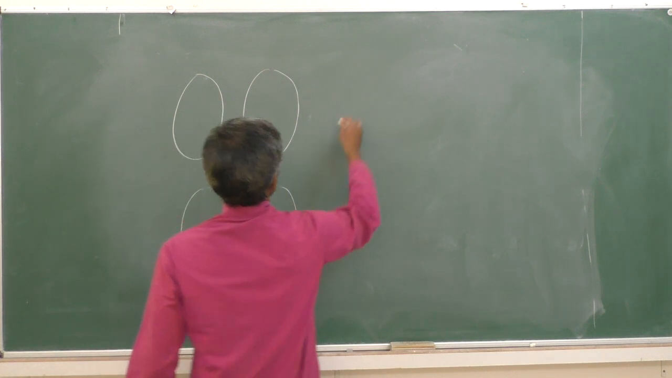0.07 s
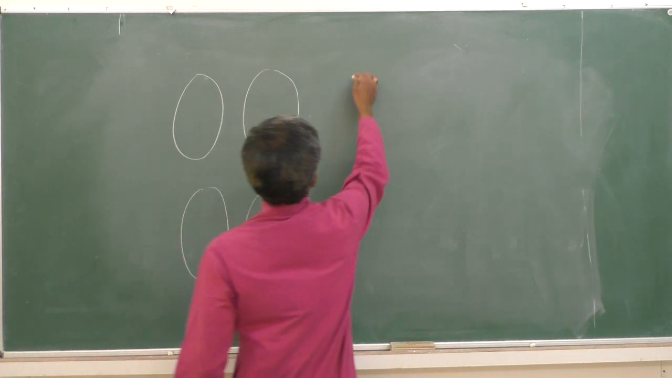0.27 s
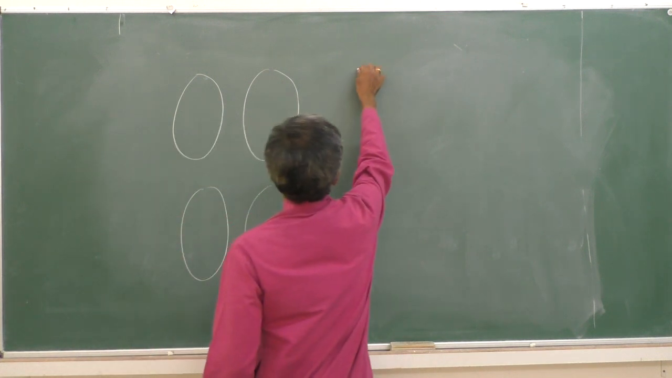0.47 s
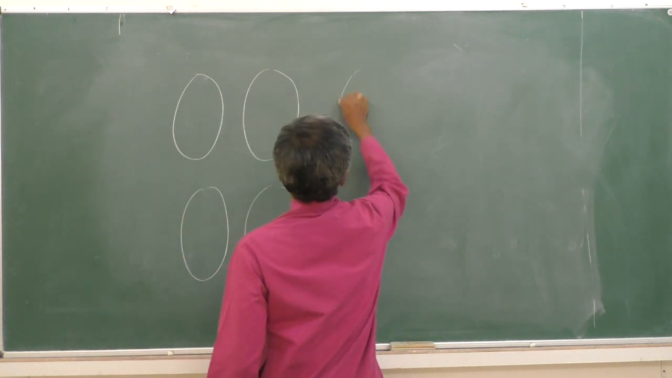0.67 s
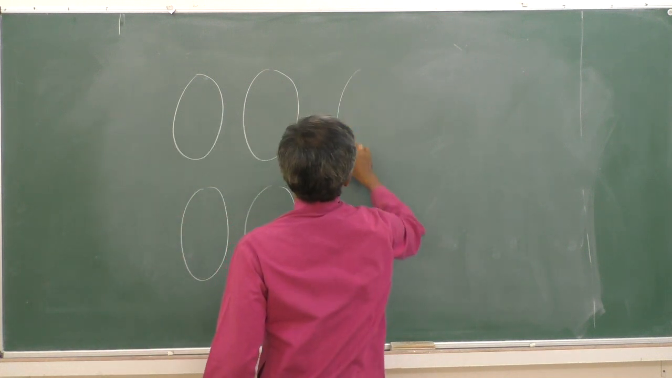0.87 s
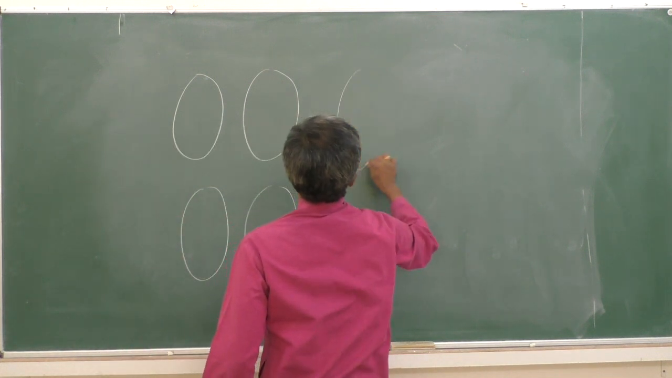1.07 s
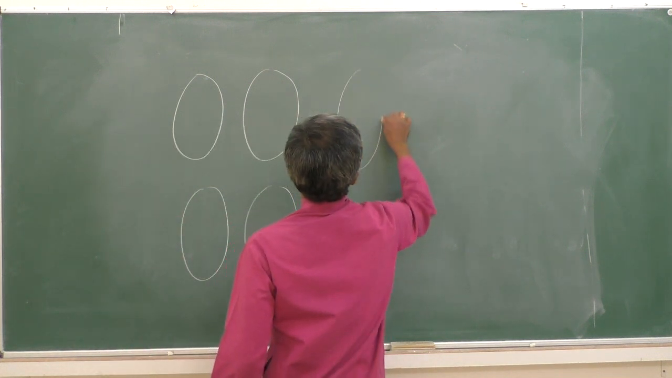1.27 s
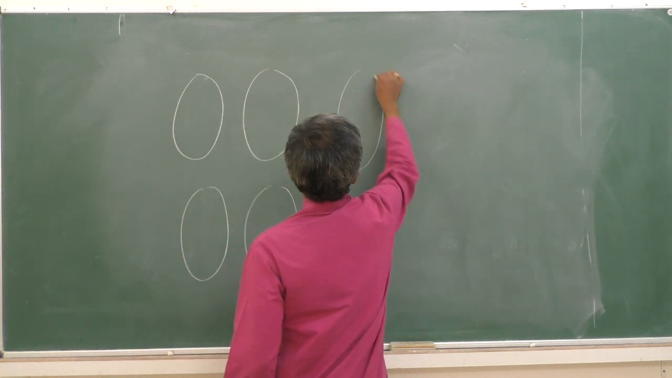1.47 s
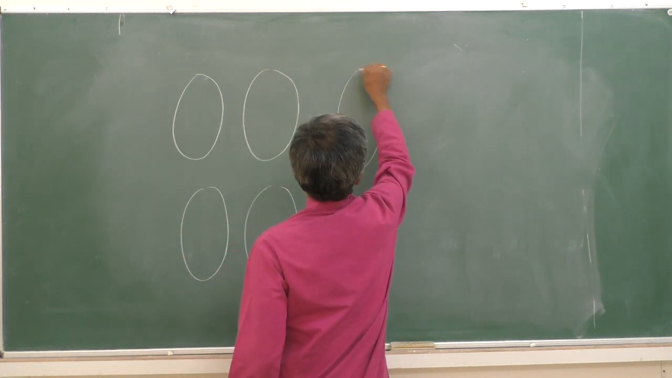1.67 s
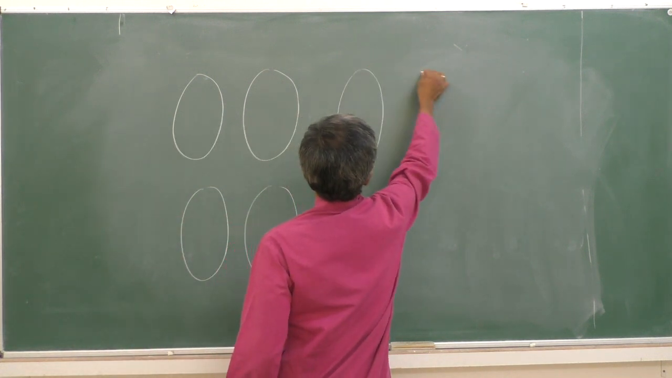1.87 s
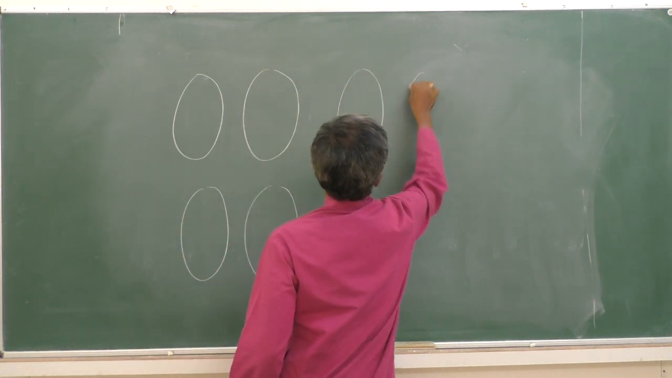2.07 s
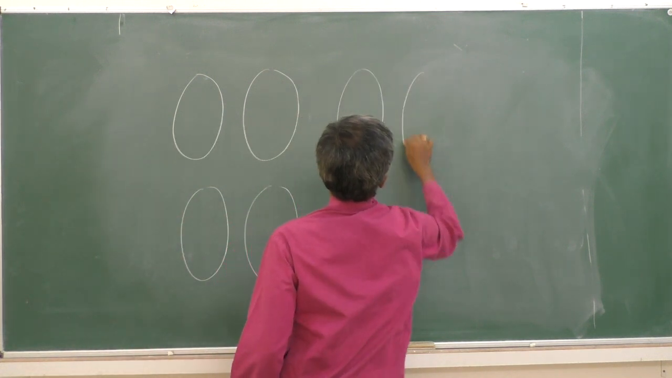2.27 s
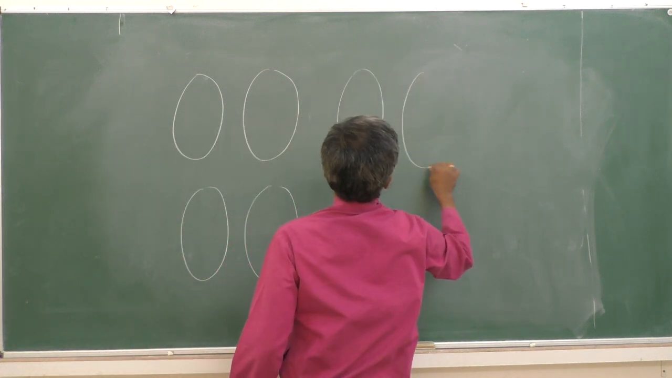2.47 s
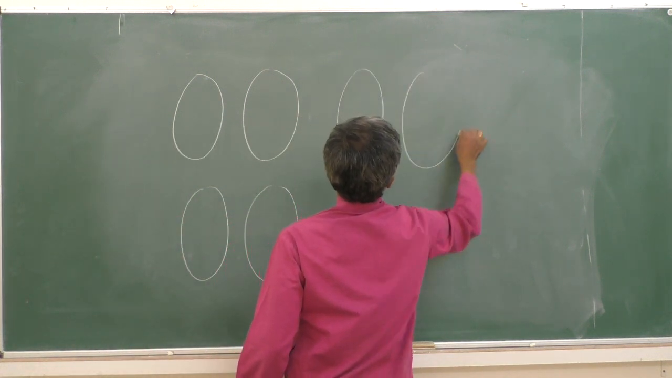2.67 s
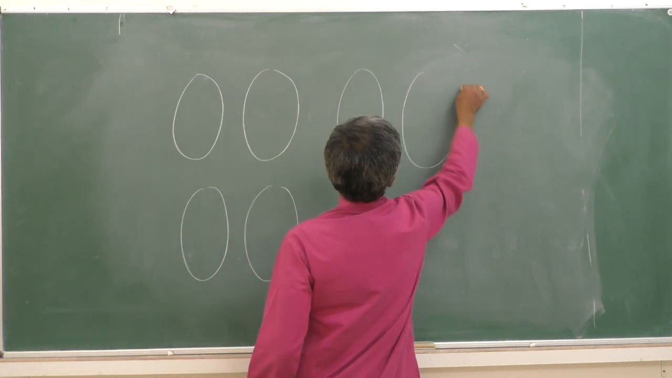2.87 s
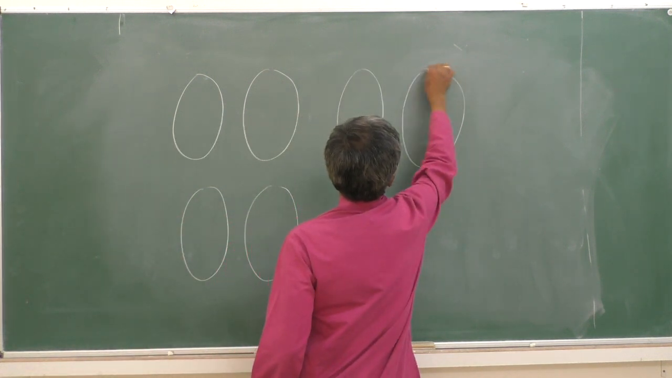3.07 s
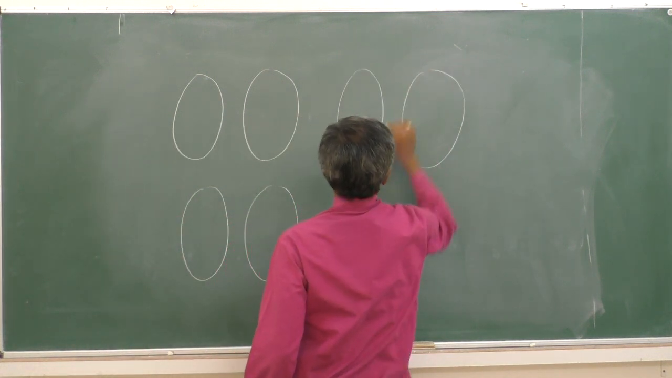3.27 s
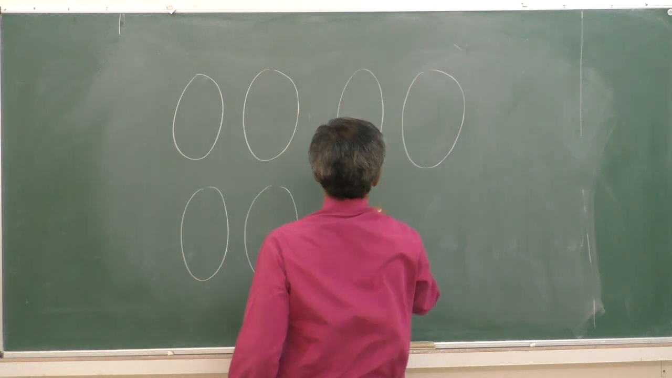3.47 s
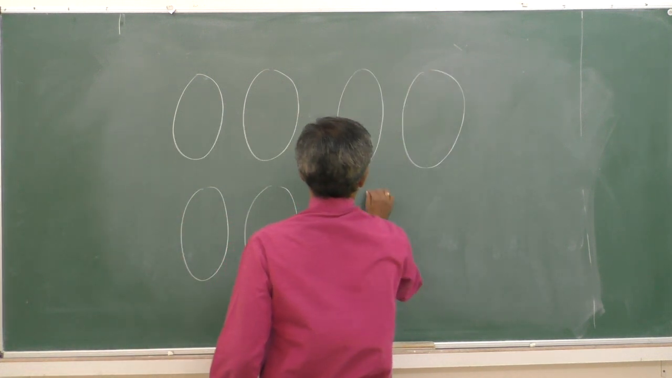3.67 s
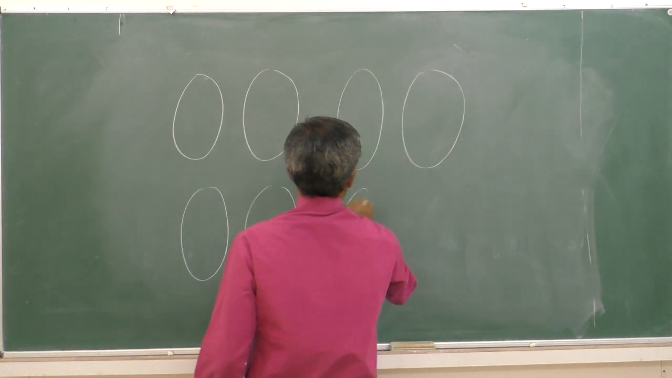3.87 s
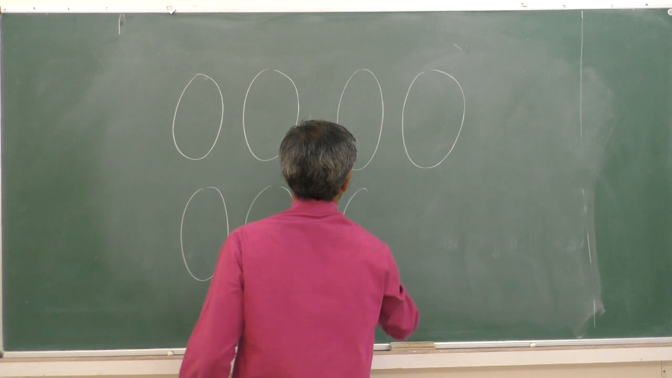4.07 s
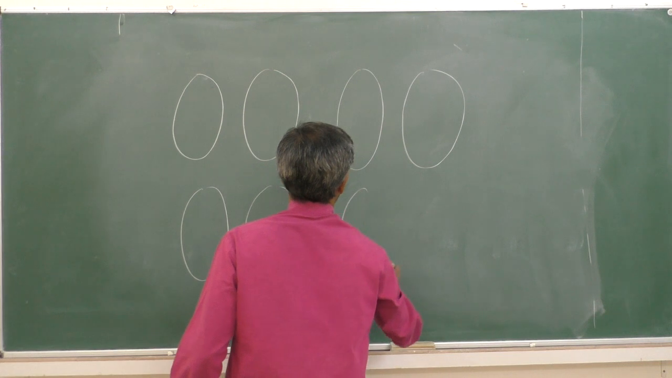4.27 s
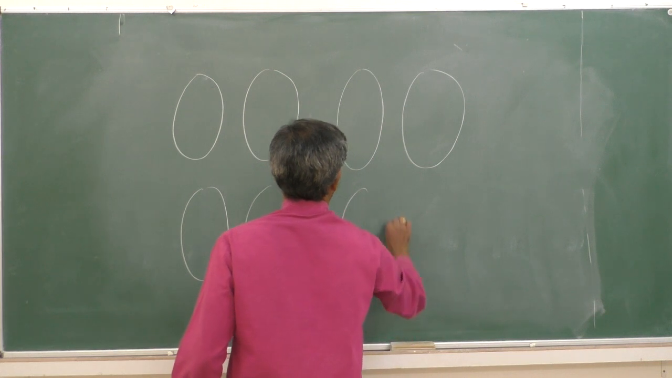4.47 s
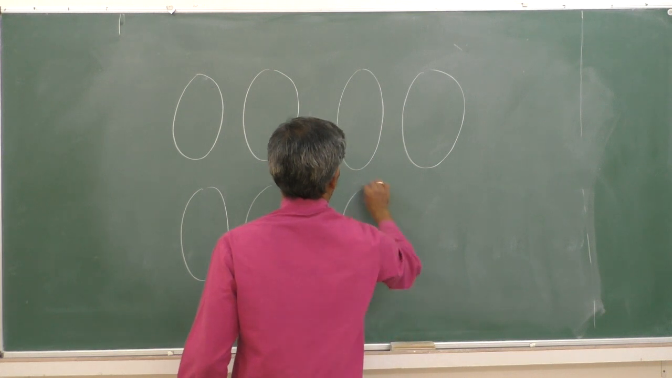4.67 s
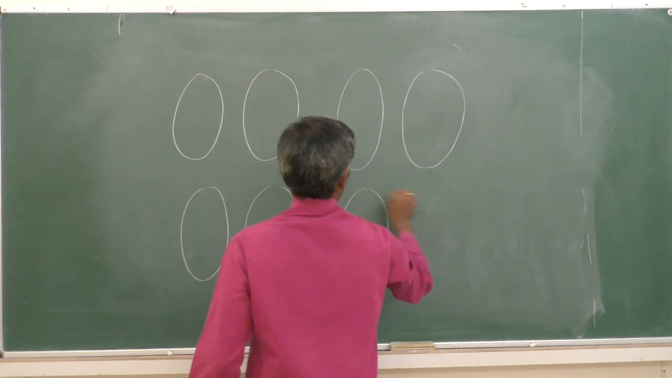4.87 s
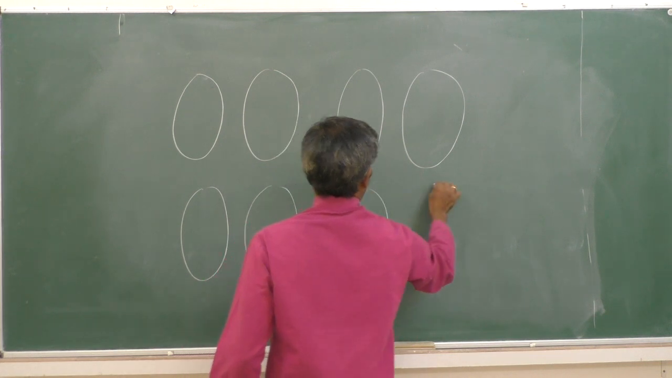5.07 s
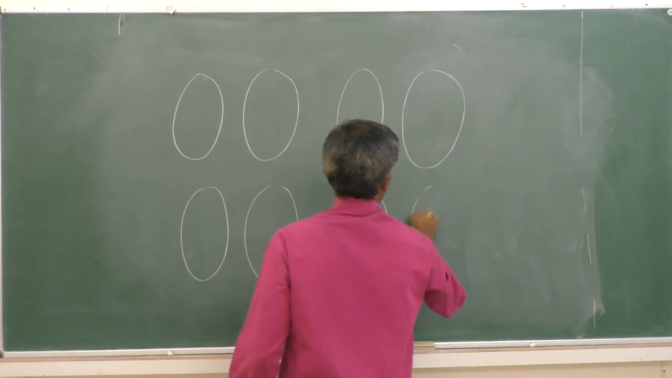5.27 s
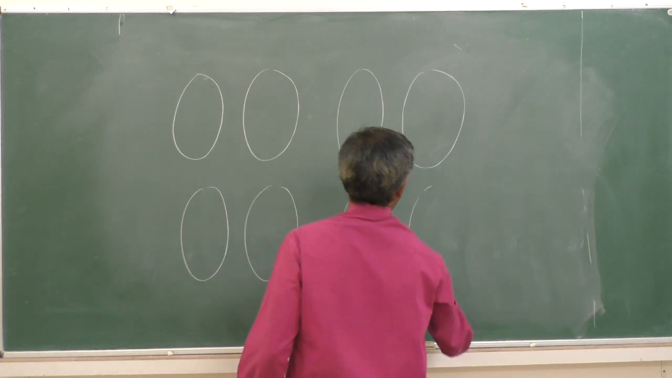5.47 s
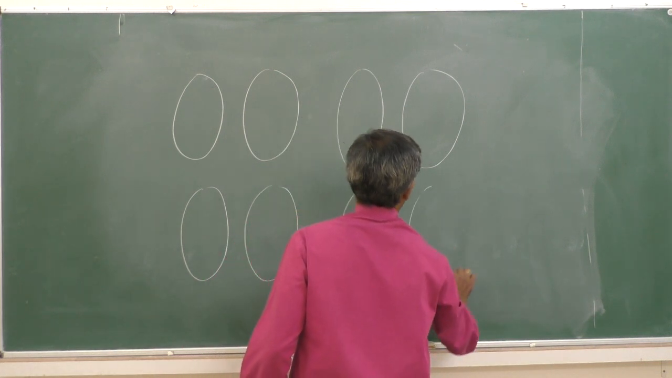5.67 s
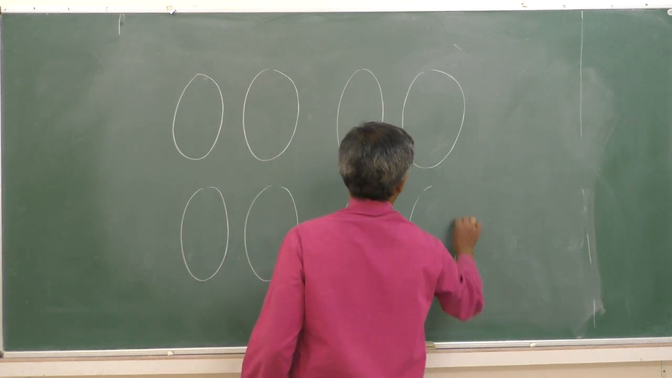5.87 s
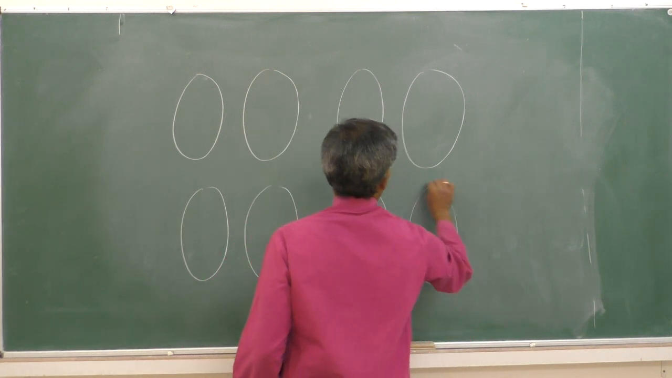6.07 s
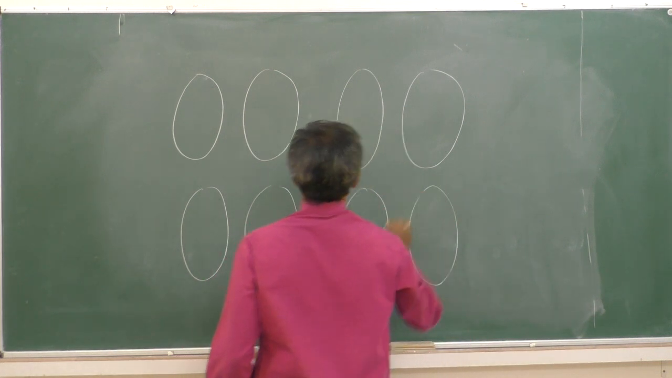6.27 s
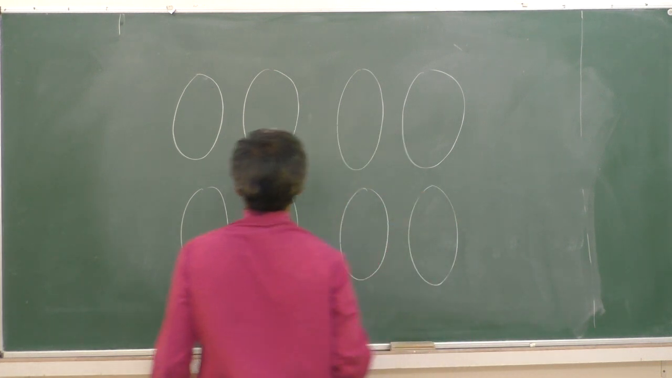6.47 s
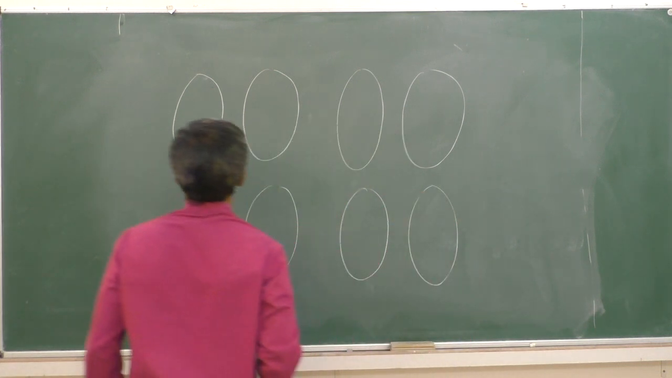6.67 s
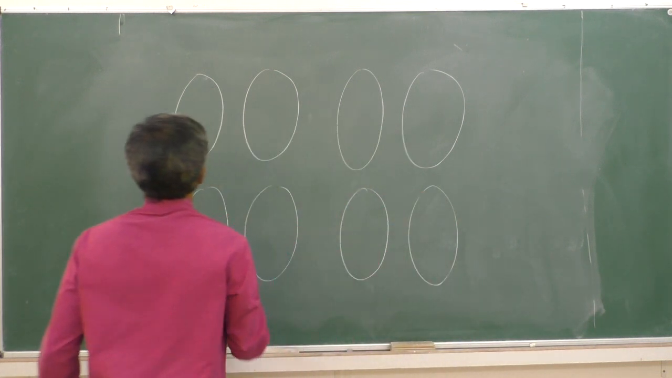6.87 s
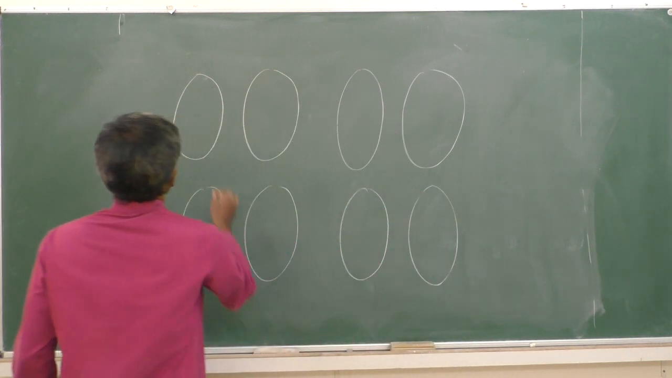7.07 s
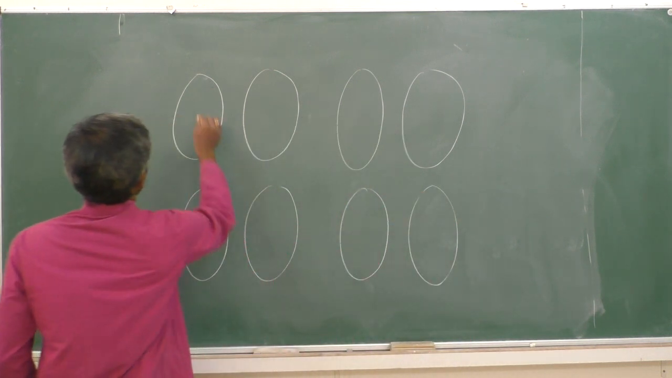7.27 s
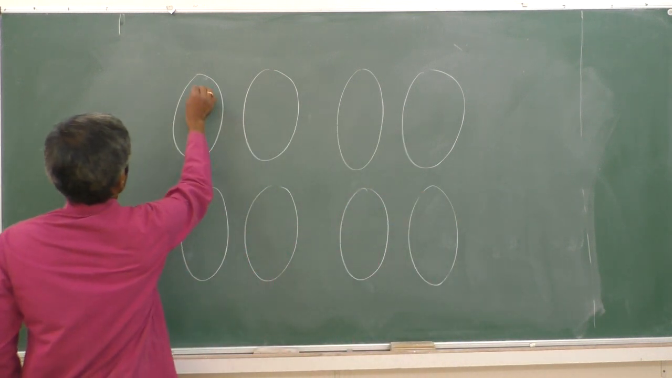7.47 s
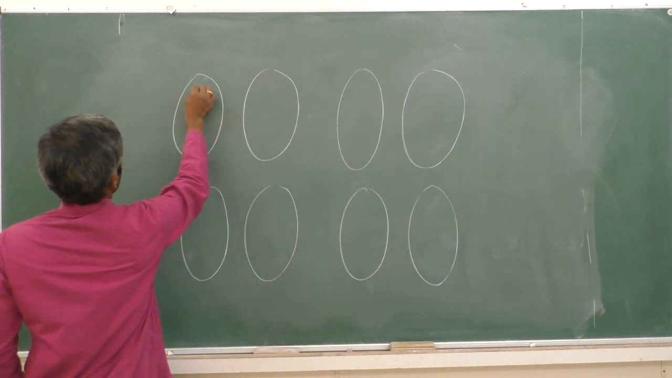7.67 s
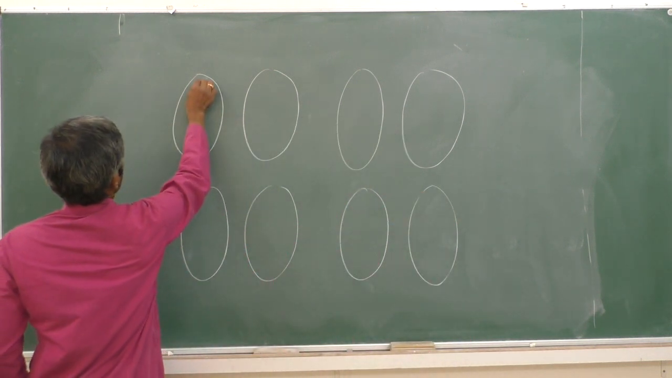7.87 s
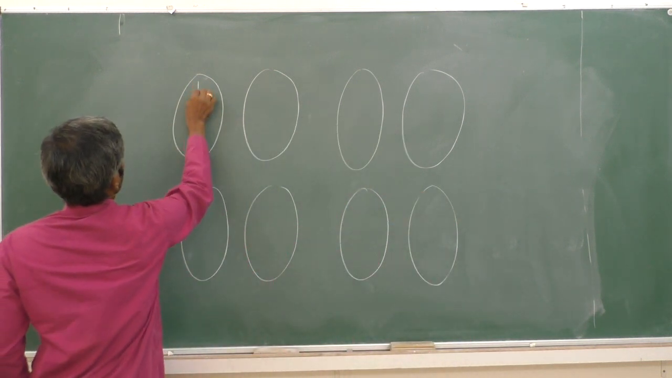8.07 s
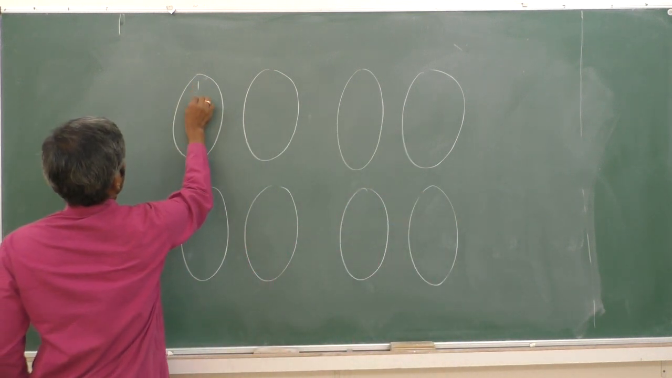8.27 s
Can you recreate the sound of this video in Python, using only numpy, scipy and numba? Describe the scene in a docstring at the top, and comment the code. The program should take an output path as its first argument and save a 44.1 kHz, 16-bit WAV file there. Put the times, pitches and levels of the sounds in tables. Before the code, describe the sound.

Four scratchy chalk ovals, each begun with a hard tap, then a pause and two small taps, in a humming, echoing classroom.

```python
"""Chalk ovals on a blackboard

Four ovals are drawn with chalk, then a character is begun, in a classroom with mains hum and soft air noise.
Taps (noise cracks, knocks, ringing modes) precede each stroke; two more fall in oval three and after the hook.
Random slips drive three moving resonances: board rasp near the oval tops, scrape and dust hiss on fast flanks.
Short echoes sweep with hand height. Filtered noise makes faint cloth rustle, soft bumps and a low rumble.
"""
import sys
import numpy as np
from scipy import signal
from scipy.fft import rfft, irfft
from scipy.io import wavfile
from scipy.ndimage import uniform_filter1d
from numba import njit

SR = 44100
rng = np.random.default_rng(int(sys.argv[2]) if len(sys.argv) > 2 else 0)


def generate_wav(sig):
    """Save sig (samples, or channels by samples) to the path in sys.argv[1] as 16-bit PCM at SR."""
    pcm = np.round(np.clip(np.atleast_2d(sig).T, -1, 1) * 32767).astype(np.int16)
    wavfile.write(sys.argv[1], SR, pcm)


N = 367353
TIME = np.arange(N) / SR


def undb(db):
    """Decibels to gain."""
    return 10 ** (np.asarray(db) / 20)


def unit(x):
    """Scale to rms 1."""
    return x / np.sqrt(np.mean(x ** 2))


def add(out, start_s, x):
    """Mix x into out from start_s on."""
    i = int(start_s * SR)
    out[i:i + len(x)] += x[:len(out) - i]


def colour(x, points, size=4096):
    """Causal minimum-phase filter through (hz, db) points, by folding the cepstrum."""
    hz, db = np.transpose(points)
    log_hz = np.log(np.maximum(np.fft.rfftfreq(size, 1 / SR), 1))
    cepstrum = irfft(np.log(undb(np.interp(log_hz, np.log(hz), db))))
    cepstrum[1:size // 2] *= 2
    cepstrum[size // 2 + 1:] = 0
    impulse = irfft(np.exp(rfft(cepstrum)))
    return signal.oaconvolve(x, impulse)[:len(x)]


def passband(x, hz, kind, order=2):
    """Butterworth filter."""
    return signal.sosfilt(signal.butter(order, hz, kind, fs=SR, output="sos"), x)


def burst(envelope, band_hz):
    """Band of noise under an envelope; its energy is set by the envelope alone."""
    x = passband(rng.standard_normal(len(envelope)) * envelope, band_hz, "band")
    return x * np.linalg.norm(envelope) / np.linalg.norm(x)


def walk(rate_hz):
    """Smooth random wander with spread near 1."""
    k = int(SR / rate_hz)
    steps = np.repeat(rng.standard_normal(N // k + 1), k)
    return unit(uniform_filter1d(steps, k)[:N])


def crumble(per_s, spread_db):
    """Tiny slips at random moments; sizes are Gaussian, times a random gain of up to 4 spread_db."""
    slips = rng.random(N) < per_s / SR
    grain_db = spread_db * np.minimum(rng.exponential(size=N), 4)
    return unit(slips * rng.standard_normal(N) * undb(grain_db))


@njit
def resonance(x, hz, width_hz):
    """State-variable band-pass with a moving centre."""
    y, b, l = np.empty(len(x)), 0., 0.
    for i in range(len(x)):
        g, k = np.tan(np.pi * hz[i] / SR), width_hz / hz[i]
        v = (b + g * (x[i] - l)) / (1 + g * (g + k))
        b, l, y[i] = 2 * v - b, l + 2 * g * v, k * v
    return y


def classroom(x, t60_s=1.35, wet_db=-2.5, dull_hz=3600, gap_s=0.0057, size=66150):
    """Diffuse tail from bare walls, weak in the treble; each call draws its own reflections."""
    t = np.arange(size) / SR
    tail = rng.standard_normal(size) * np.exp(-np.log(1000) * t / t60_s) * (t > gap_s)
    # wet_db is the tail energy before the low-pass
    tail = passband(tail / np.linalg.norm(tail), dull_hz, "low")
    return x + undb(wet_db) * signal.oaconvolve(x, tail)[:len(x)]


# mains harmonics: (multiple, rms_db)
HARMONICS = [(1, -47), (2, -89.5), (3, -61.5), (4, -91.5), (5, -74.5), (7, -87.5), (9, -86), (13, -89),
             (15, -91)]
# room rush spectrum: (pitch_hz, relative_db)
AIR_COLOUR = [(20, 4), (60, 10.5), (100, 7), (200, 2.5), (400, -3), (700, -0.5), (1150, 2), (2000, 1),
              (3000, -3), (4500, -9), (7000, -17.5), (10000, -22), (12800, -25.5), (15000, -52)]
MAINS_HZ = 50
AIR_DB = -73  # rms within 900-4000 Hz


def background():
    """Steady mains hum, mostly odd harmonics, over the soft rush of the room."""
    hum = np.zeros(N)
    for multiple, rms_db in HARMONICS:
        hum += undb(rms_db) * np.sqrt(2) * np.cos(2 * np.pi * multiple * MAINS_HZ * TIME)
    air = colour(rng.standard_normal(N), AIR_COLOUR)
    air = air / np.std(passband(air, [900, 4000], "band"))
    return hum + air * undb(AIR_DB)


# knocks at the microphone: (start_s, level_db, low_edge_hz, high_edge_hz, decay_s)
MIC_BUMPS = [(0.16, -60, 15, 60, 0.062), (1.36, -68, 20, 90, .03), (2.334, -57.5, 15, 171, .018),
             (2.775, -57, 27, 280, 0.017), (3.383, -44.5, 15, 42, 0.037), (3.384, -54, 133, 370, 0.0056),
             (3.4094, -52, 190, 950, 0.0039), (7.082, -60, 30, 170, 0.019)]


def bumps(size=32768):
    """Dull knocks right at the microphone: decaying noise bands, without room tail."""
    out, t = np.zeros(N), np.arange(size) / SR
    for start_s, level_db, low_hz, high_hz, decay_s in MIC_BUMPS:
        add(out, start_s, undb(level_db) * burst(np.exp(-t / decay_s), [low_hz, high_hz]))
    return out


# chalk meets board: (start_s, low_knock_hz, low_knock_db, high_knock_hz, high_knock_db, crack_db)
CHALK_TAPS = [(0.467, 1360, -50.5, 2530, -55.5, -54), (1.929, 1320, -53.5, 2150, -60, -42),
              (3.7439, 1350, -46.5, 2590, -46.5, -50), (4.051, 1650, -53, 2060, -66, -53),
              (5.1564, 1130, -47, 2170, -45.5, -46.5), (7.944, 1190, -55, 1870, -56, -56.5),
              (8.262, 1450, -53.5, 2200, -60, -55)]
# ringing of the panel, detuned per tap: (nominal_hz, relative_db, t60_s)
PANEL_MODES = [(810, 1.5, 0.076), (1130, -19, 0.048), (1260, -26, 0.03), (1590, -24, .05),
               (1416, 13, 0.071), (1790, -4, 0.046), (2180, -8, 0.036), (2440, -26, 0.045),
               (2518, 12, 0.041), (2740, -9, 0.033), (2900, 2, .04), (3380, -6, 0.026)]
# crack spectrum: (pitch_hz, relative_db)
TIP_CRACK_COLOUR = [(300, -10), (650, -8.5), (2000, -5.5), (3800, 4.5), (4700, 3), (6000, 0.5), (7000, -11),
                    (9300, -17.5), (10500, -17), (14000, -39)]


def taps(ring_db=-22, swell_s=0.003, crack_s=0.0014, spread=1.27, panel_hz=4000, size=44100):
    """The tip cracks at once; slower bending waves cross the panel as a knock and leave its modes ringing."""
    out, t = np.zeros(N), np.arange(size) / SR
    swell = t / swell_s * np.exp(1 - t / swell_s)
    band = np.array([1 / spread, spread])
    for start_s, low_hz, low_db, high_hz, high_db, crack_db in CHALK_TAPS:
        crack = unit(colour(rng.standard_normal(size), TIP_CRACK_COLOUR)) * np.exp(-t / crack_s)
        low_knock = undb(low_db) * burst(swell, low_hz * band)
        high_knock = undb(high_db) * burst(swell, high_hz * band)
        knock = passband(low_knock + high_knock, panel_hz, "low", order=4)
        ring = np.zeros(size)
        for nominal_hz, mode_db, t60_s in PANEL_MODES:
            # each spot on the board detunes the modes a little
            mode_hz = nominal_hz * (1 + 0.036 * rng.standard_normal())
            wave = np.sin(2 * np.pi * mode_hz * t) * rng.choice([-1, 1])
            ring += undb(mode_db - 60 * t / t60_s) * wave
        tap = undb(crack_db) * crack + knock + undb(low_db + ring_db) * ring
        add(out, start_s, classroom(tap))
    return out


def loop(times_s, lift_speed):
    """Motion of one stroke: progress (0 start, 1 turn, 2 end), hand speed (0-1), depth below the top (0-1)."""
    progress = np.interp(TIME, times_s, np.arange(len(times_s)) / 2)
    speed = np.abs(np.sin(np.pi * progress))
    # the chalk leaves the board while it is still moving
    speed = speed + lift_speed * (1 - speed) * (progress > 3 / 2)
    depth = np.sin(np.interp(TIME, times_s[::2], [0, np.pi / 2, np.pi])) ** 2
    return progress, speed, depth


# one looping stroke a row, four ovals and a small hook; levels before the trims in drawing():
# ((start_s, fastest_down_s, turn_s, fastest_up_s, end_s),
#  (scrape_down_db, scrape_up_db, bend_vs_fast_db, stick_ring_hz), lift_off_speed (0-1),
#  (dust_vs_scrape_db, dust_rise_scale_hz), (rasp_start_db, rasp_turn_db, rasp_end_db),
#  (rasp_start_hz, rasp_end_hz))
CHALK_STROKES = [((0.5, 0.76, 1.118, 1.35, 1.63), (-65.5, -67.5, -8, 4040), 0.17, (-5.5, 3100),
                 (-66, -73, -71), (1500, 1930)), ((1.97, 2.26, 2.58, 2.7, 3.11), (-65, -72, -6.5, 4300),
                 0.097, (-4, 2100), (-69.5, -79, -66.5), (1660, 1700)), ((3.78, 4.03, 4.35, 4.58, 4.725),
                 (-70.5, -75.5, -4, 4198), 0.1, (-5, 100), (-63.5, -77.5, -67), (1420, 1500)),
                 ((5.19, 5.43, 5.698, 5.9, 6.125), (-73, -75.5, -2, 3950), 0.63, (-2.9, 1000),
                 (-62, -74, -62.5), (1250, 850)), ((7.99, 8.02, 8.045, 8.065, 8.085), (-74, -74, -2, 4400),
                 0.72, (1, 1200), (-86, -82.5, -78), (1470, 1470))]
TURN_RASP_HZ, STICK_HZ, DUST_HZ = 1960, 4330, 8370  # rasp at the turn; stick off the board; base of the hiss
RASP_FALL_POWER, RASP_RETURN_POWER = 1.5, 1  # above 1, rasp stays strong until near the bottom
BITE_S, BITE_SCRAPE_DB, BITE_RASP_DB = 0.18, -5.5, -4  # the chalk takes a moment to bite
DUST_SWING = 1.11  # dB of hiss per dB of scrape sink
DUST_BUILD_S, FRESH_DUST_DB = 0.33, -3  # dust gathers under the tip
BEND_RISE_HZ = 300  # the stick rings higher when it moves slowly


def hand(fade_s=0.012):
    """Gains and centres (Hz) of rasp, scrape and hiss, and hand height (-1 to 1), from the stroke motion."""
    gains, height = np.zeros((3, N)), np.zeros(N)
    centres_hz = np.outer([TURN_RASP_HZ, STICK_HZ, DUST_HZ], np.ones(N))
    for times_s, scrape, lift_speed, dust, rasp_levels_db, rasp_ends_hz in CHALK_STROKES:
        down_db, up_db, bend_db, ring_hz = scrape
        dust_db, rise_hz = dust
        start_db, turn_db, end_db = rasp_levels_db
        start_hz, end_hz = rasp_ends_hz
        # fades lie just outside the stroke
        contact = np.clip(np.minimum(TIME - times_s[0], times_s[-1] - TIME) / fade_s + 1, 0, 1)
        on = contact > 0
        progress, speed, depth = (v[on] for v in loop(times_s, lift_speed))
        age_s = TIME[on] - times_s[0]
        loose = np.clip(1 - age_s / BITE_S, 0, 1)
        fresh = np.clip(1 - age_s / DUST_BUILD_S, 0, 1)

        # rasp follows depth
        sinking = progress < 1
        top_db = np.where(sinking, start_db, end_db)
        top_hz = np.where(sinking, start_hz, end_hz)
        power = np.where(sinking, RASP_FALL_POWER, RASP_RETURN_POWER)
        rasp_db = top_db + (turn_db - top_db) * depth ** power + BITE_RASP_DB * loose

        # scrape and hiss follow speed
        flank_db = np.interp(progress, [1 / 2, 3 / 2], [down_db, up_db])
        sink_db = bend_db * (1 - speed ** 2) + BITE_SCRAPE_DB * loose
        hiss_db = flank_db + dust_db + DUST_SWING * sink_db + FRESH_DUST_DB * fresh
        gains[:, on] = contact[on] * undb([rasp_db, flank_db + sink_db, hiss_db])

        # hiss rises in the fast, low part of a loop
        dust_rise_hz = rise_hz * 2 * (speed * depth) ** 2 * undb(flank_db - down_db)
        centres_hz[:, on] = [top_hz + (TURN_RASP_HZ - top_hz) * depth,
                             ring_hz + BEND_RISE_HZ * (1 - speed),
                             DUST_HZ + dust_rise_hz]
        height[on] = 1 - 2 * depth
    return gains, centres_hz, height


def sweep(x, height, lag_s=0.001216, travel_s=0.00047, far_lag_s=.0024, far_travel_s=.0006):
    """Two short echoes whose paths grow as the hand sinks: a gliding comb."""
    near = np.interp(TIME - lag_s + travel_s * height, TIME, x)
    far = np.interp(TIME - far_lag_s + far_travel_s * height, TIME, x)
    return unit(x + .34 * near + .2 * far)


# board rasp spectrum: (pitch_hz, relative_db)
BOARD_RASP_COLOUR = [(400, -15), (750, -14.5), (1100, -2), (1600, 0), (2250, 1), (2900, -4), (3500, -2),
                     (4400, -20), (8000, -34.5)]
# chalk stick spectrum: (pitch_hz, relative_db)
STICK_SCRAPE_COLOUR = [(1500, -18), (3250, -15), (3800, -1), (4400, 0), (5000, 0), (5500, 1), (6400, 2.5),
                       (7300, -2), (9000, -7.5), (14000, -35.5)]
# dust hiss spectrum: (pitch_hz, relative_db)
DUST_HISS_COLOUR = [(4000, -23), (6500, -4), (7500, -4), (8400, -2), (9300, -5), (10300, -7.5),
                    (11500, -5.5), (13000, -5.5), (15500, -15.5)]


def drawing(flutter_db=1.03, rasp_width_hz=740.0, scrape_width_hz=1330.0, dust_width_hz=4500.0):
    """Slips drive the board, the chalk stick and the dust hiss together; the grip flutters."""
    (rasp_gain, scrape_gain, dust_gain), (rasp_hz, scrape_hz, dust_hz), height = hand()
    slips = sweep(crumble(per_s=13000, spread_db=-1.0), height) * undb(flutter_db * walk(45))
    rasp = unit(resonance(colour(slips, BOARD_RASP_COLOUR), rasp_hz, rasp_width_hz))
    scrape = unit(resonance(colour(slips, STICK_SCRAPE_COLOUR), scrape_hz, scrape_width_hz))
    dust = unit(resonance(colour(slips, DUST_HISS_COLOUR), dust_hz, dust_width_hz))
    return undb(-1.5) * rasp_gain * rasp + undb(-0.85) * scrape_gain * scrape + undb(0.2) * dust_gain * dust


# swells of rustle and rumble: (peak_s, half_length_s, level_db, centre_hz)
SWELLS = [(3.45, 0.1, -75, 960), (3.48, 0.079, -76, 3370), (6.803, 0.55, -59, 24),
          (6.985, .11, -88.5, 7600), (7.05, 0.38, -73, 75), (7.156, 0.38, -76.5, 210),
          (7.63, 0.1, -84, 7500)]


def rustles():
    """Swells of rubbing cloth, and a low rumble while the writer steps aside: bands of random slips."""
    fibres = crumble(per_s=16000, spread_db=0.0)
    out = np.zeros(N)
    for peak_s, half_s, level_db, centre_hz in SWELLS:
        envelope = np.exp(-((TIME - peak_s) / half_s) ** 2)
        rub = unit(passband(fibres, [centre_hz / 1.3, centre_hz * 1.25], "band"))
        out += undb(level_db) * envelope * rub
    return out


def scene():
    """Chalk in the room, with the rustles, the near bumps, the hum and the air."""
    return (background() + bumps() + taps() + classroom(drawing()) + rustles())[None]


TOP_HZ = 15650


def record(dry):
    """The recorder cuts the top: a steep elliptic low-pass."""
    return signal.sosfilt(signal.ellip(10, .1, 80, TOP_HZ, fs=SR, output="sos"), dry)


dry = scene()
out = record(dry)
generate_wav(out)
```